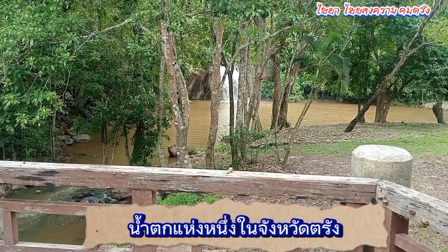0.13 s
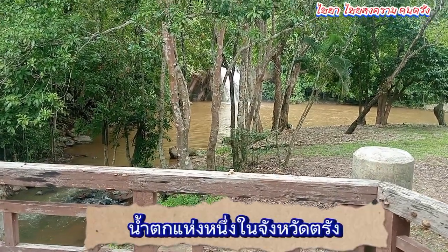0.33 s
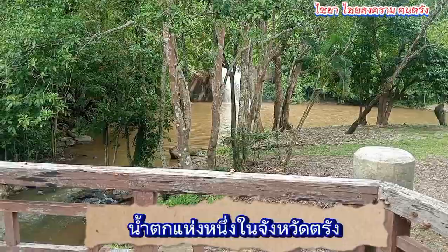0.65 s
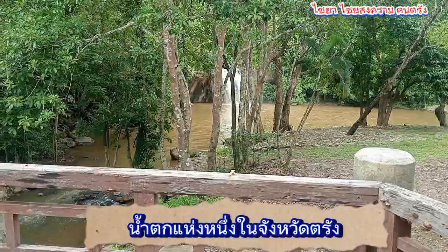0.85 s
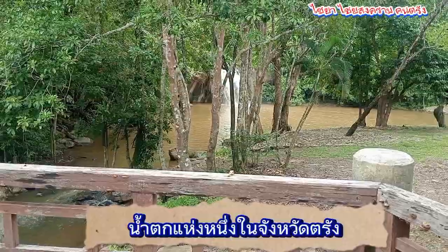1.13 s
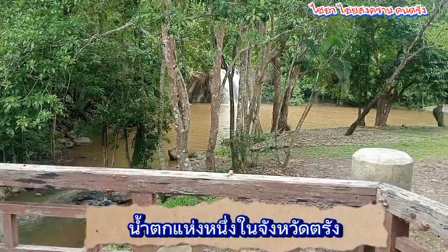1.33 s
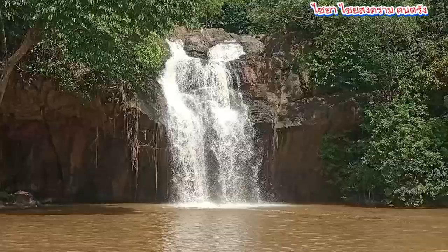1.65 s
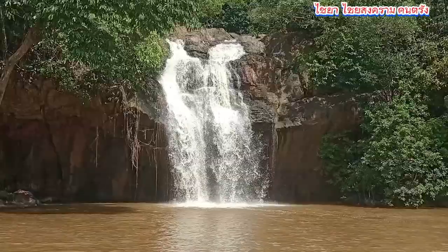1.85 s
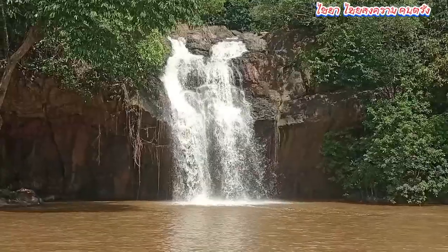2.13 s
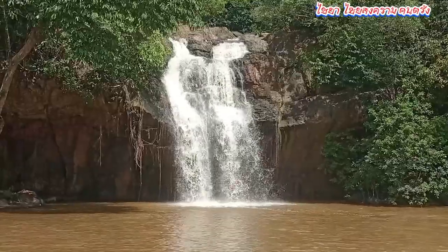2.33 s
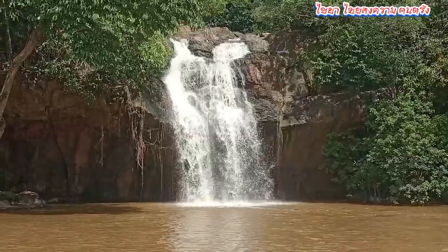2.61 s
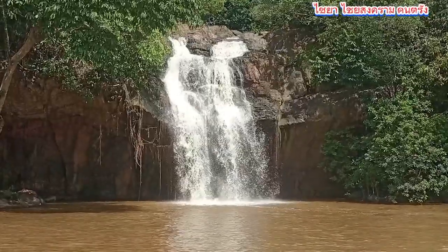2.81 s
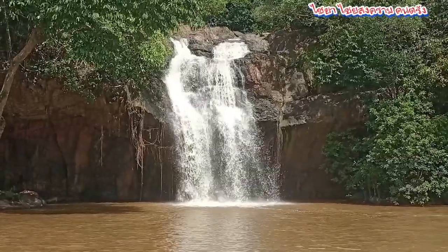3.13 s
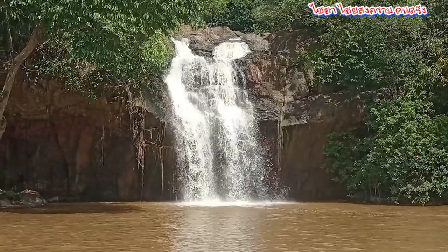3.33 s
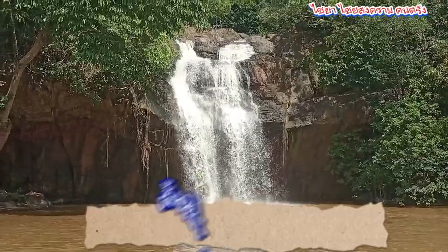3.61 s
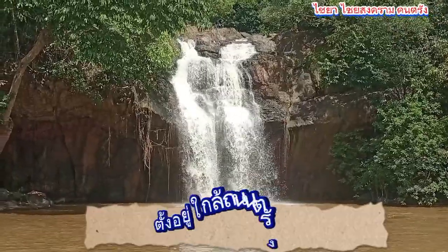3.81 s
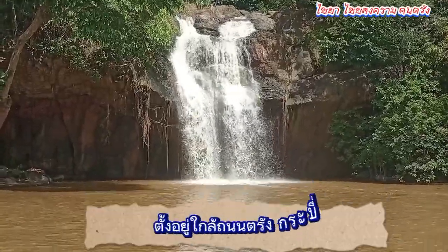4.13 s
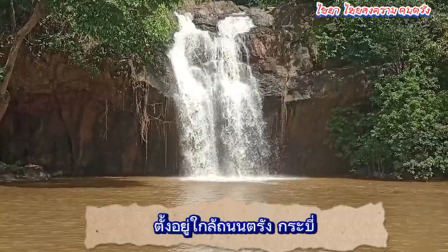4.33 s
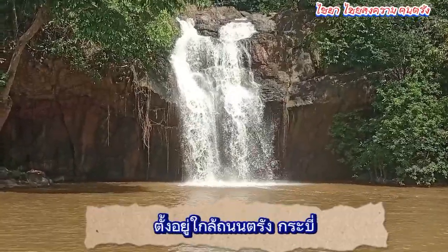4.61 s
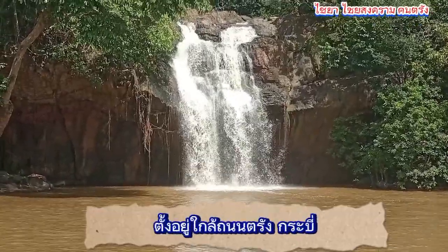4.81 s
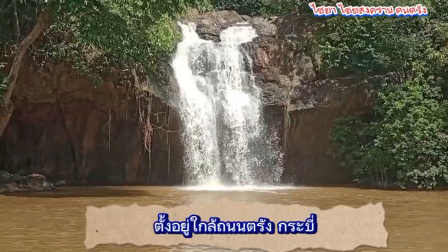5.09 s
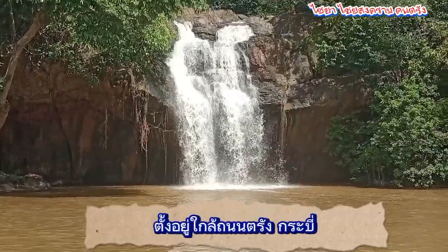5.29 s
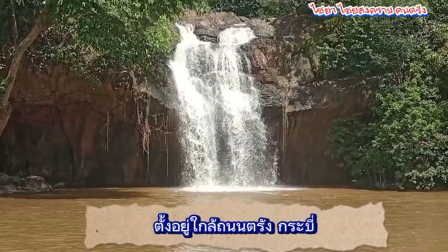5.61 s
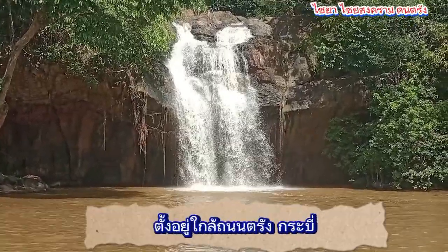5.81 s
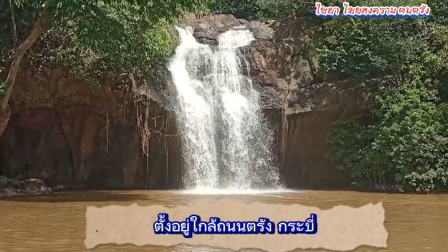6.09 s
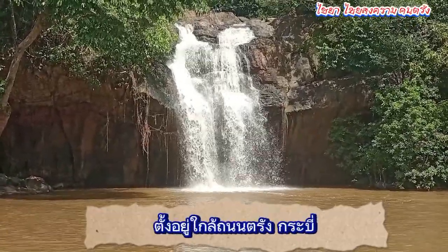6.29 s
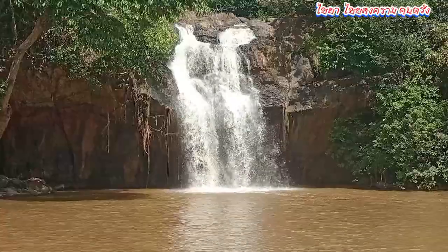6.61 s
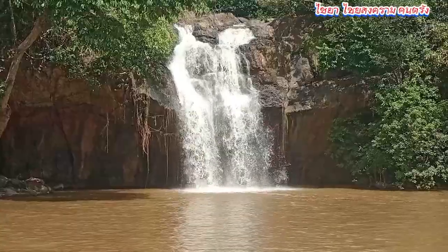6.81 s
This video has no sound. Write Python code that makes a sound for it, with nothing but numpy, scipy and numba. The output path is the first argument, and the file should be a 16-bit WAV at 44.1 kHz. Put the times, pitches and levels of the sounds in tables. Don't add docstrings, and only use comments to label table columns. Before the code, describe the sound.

Outdoors in a forest, a distant swollen river rushes smoothly while one cicada buzzes faintly, thin insects whistle very high and a far motor hums in soft swells. It cuts to a blink of silence, then a much louder waterfall surges in, drumming into its pool, with a throbbing cicada chorus and a low engine drone. One phone microphone, nearly mono, no reverberant space.

```python
import sys
import numpy as np
from scipy import signal
from scipy.fft import rfft, irfft
from scipy.io import wavfile
from scipy.ndimage import uniform_filter1d
from numba import njit

SR = 44100
rng = np.random.default_rng(int(sys.argv[2]) if len(sys.argv) > 2 else 0)


def persist_wave(psi):
    counts = np.round(np.clip(psi, -1, 1) * 32767).astype(np.int16)
    wavfile.write(sys.argv[1], SR, np.atleast_2d(counts).T)


def volts(x):
    e = np.asarray(x, float) / 20
    return 10 ** e


N = 306495
TIME = np.arange(N) / SR
FREQ = np.fft.rfftfreq(N, 1 / SR)
TOP_HZ = 15530
STOP_S, START_S = 1.6695, 1.7295

# time_s, length_s, level_db
HUM = [
    (.15, .26, -48),
    (.35, .16, -49),
    (.56, .3, -47),
    (.8, .22, -54),
    (1.06, .16, -50),
    (1.19, .12, -48),
    (1.33, .15, -48),
    (1.62, .14, -48),
]
# time_s, firing_rate_hz, level_db
ENGINE = [
    (1.74, 41.2, 0.5),
    (2.6, 40.51, -2),
    (3.6, 39.47, 1.5),
    (4.5, 38.37, 0.5),
    (5.4, 37.85, -0.5),
    (6.17, 36.98, -4),
    (6.95, 35.73, -2),
]
# multiple of firing rate, level_db, fade_db_per_s
ENGINE_TONES = [(2, -43, 3), (3, -45.5, 0), (4, -45, 0), (5, -45.5, 0), (6, -45, .5), (7, -47, 0),
                (8, -49, 0.5), (9, -49.5, 0.5)]
# time_s, length_s, multiple, boost_db
CLEARINGS = [(2.75, .4, 2, 5), (3.3, 0.27, 2, 7), (5.62, 0.89, 2, 8), (2.53, 1.6, 4, 6.5),
             (3.87, 0.38, 4, 6), (6.2, .4, 4, 5), (5.62, 0.27, 4, 6), (6.62, 0.79, 4, 9),
             (2.685, 0.37, 5, 13.5), (3.45, .3, 5, 8.5), (3.75, 0.38, 5, 6.5), (3.46, 0.41, 6, 8.5),
             (4.22, .3, 6, 7), (4.85, .5, 6, 8.5), (4.95, 0.32, 3, 5), (6.83, .3, 3, 6), (3.45, .5, 7, 6),
             (4.2, .4, 7, 6), (4.78, .3, 7, 6)]
# time_s, resonance_hz
BANK_CICADA = [
    (0, 6770),
    (.47, 6520),
    (1.06, 6900),
    (1.36, 6620),
    (1.52, 6510),
    (1.67, 6560),
]
# start_s, end_s, start_hz, end_hz, level_db
WHISTLES = [
    (.2, .58, 11780, 11500, -64),
    (.62, .8, 11480, 11380, -65),
    (.03, .22, 10950, 10800, -65),
    (.28, .6, 11000, 10850, -66),
    (.62, .95, 10850, 10950, -66),
    (1.02, 1.36, 10850, 11000, -64),
    (1.38, 1.68, 11820, 11520, -63),
]
# time_s, length_s, change_db
CHORUS_SWELLS = [
    (2.12, .3, 3),
    (2.31, .1, -8),
    (2.393, .06, 2),
    (3.19, .08, 1),
    (4.05, 0.42, 1.5),
    (4.516, .25, 2),
    (5.6, .15, 2),
    (6.0, .2, 2.5),
    (6.53, .3, 3),
]
# time_s, length_s, change_db
HEAVES = [(.44, 0.14, 2), (.87, .12, -2), (1.27, 0.27, 1), (1.47, .12, -3), (2.42, 0.14, 1.5),
          (2.673, 0.16, 0), (3.103, 0.29, -1.5), (3.39, .12, 0.5), (3.5, 0.11, 2), (3.85, .2, 0),
          (4.02, .12, -1.5), (4.296, .2, 2.5), (4.409, 0.073, -5), (4.55, .15, 1.5), (4.77, 0.17, 2.5),
          (4.9, .1, -3), (5.08, 0.23, 0), (5.45, .25, -0.5), (5.62, .15, 1), (5.96, 0.13, 1),
          (6.301, 0.58, -0.5), (6.9, .2, -3)]
# pitch_hz, level_db (per Hz)
RIVER_RUMBLE = [(50, -40), (85, -10), (92, -2.5), (125, -2.5), (166, -3), (217, -2.5), (329, -3.5),
                (413, -11), (544, -8), (577, -3.5), (625, -6.5), (717, -2), (900, -8.5), (1170, -35),
                (1980, -120)]
RIVER_HISS = [(530, -45), (900, -14.5), (1030, -8), (1120, -8.5), (1350, -4.5), (1620, -10), (1880, -5),
              (2100, -8.5), (2420, -5), (3200, -8), (3440, -10), (4330, -17), (5000, -24), (6500, -49),
              (11000, -120)]
RIVER_SPRAY = [(2940, -35), (5000, -10), (5850, -8.5), (6870, -6.5), (7550, -11), (8740, -2), (9430, -1.5),
               (10400, -7), (11800, -8.5), (12300, -11), (15500, -18)]
FALL_RUMBLE = [(21, -50), (35, -29.5), (89, -6), (174, -1), (248, -1.5), (352, -6.5), (426, -11), (537, -8),
               (900, -9.5), (1170, -49), (1980, -120)]
FALL_HISS = [(530, -19), (900, -8.5), (1460, -8.5), (1750, -4.5), (2680, -7.5), (3000, -6.5), (3570, -1),
             (4520, -11.5), (5000, -18), (6500, -36), (11000, -120)]
FALL_SPRAY = [(2940, -42), (5000, -14.5), (5600, -9), (6070, -8), (6610, -5.5), (7770, -12.5), (9890, -4),
              (11900, -15.5), (13700, -20), (14900, -18), (15500, -23)]
# hiss_db, rumble_minus_hiss_db, spray_minus_hiss_db
RIVER_LEVELS = (-41, -0.56, -9.5)
FALL_LEVELS = (-31, -4, -8.5)
# time_s, centre_hz
WIDE_MOMENTS = [(.109, 9650), (.805, 6280), (1.13, 4700), (1.13, 12080), (1.641, 9650), (2.222, 7900),
                (2.222, 12400), (2.315, 4700), (2.315, 6940), (2.315, 12780), (2.338, 5490), (2.5, 5170),
                (2.5, 12440), (3.011, 9000), (3.127, 7610), (3.336, 4670), (3.94, 14500), (4.01, 9670),
                (4.219, 8940), (4.59, 8640), (5.217, 7950), (5.287, 4960), (6.053, 11380), (6.123, 11050),
                (6.425, 5210)]


def unit(x):
    return x / np.sqrt(np.mean(x ** 2))


def curves(table):
    s, *columns = np.transpose(table)
    return [np.interp(TIME, s, column) for column in columns]


def walk(rate_hz):
    hold = int(SR / rate_hz)
    steps = np.repeat(rng.standard_normal(N // hold + 1), hold)[:N]
    return 1.1 * uniform_filter1d(uniform_filter1d(steps, hold), hold)


def swell(s, length_s):
    return np.cos(np.pi * np.clip((TIME - s) / length_s, -.5, .5)) ** 2


def ring(x, hz, width_hz):
    pole = np.exp((2j * np.pi * hz - np.pi * width_hz) / SR)
    a = [1, -2 * pole.real, abs(pole) ** 2]
    once = signal.lfilter([1], a, x)
    return unit(signal.lfilter([1, 0, -1], a, once))


def heave():
    return sum(db * swell(s, length_s) for s, length_s, db in HEAVES)


def motor():
    hz = 68 + 2.5 * walk(9)
    level = sum(volts(db) * swell(s, length_s) for s, length_s, db in HUM)
    hum = level * np.sin(2 * np.pi * np.cumsum(hz) / SR)
    ground = ring(rng.standard_normal(N), 32, 40)
    return hum + volts(-73) * ground


def engine():
    hz, level_db = curves(ENGINE)
    phase = 2 * np.pi * np.cumsum(hz * (1 + .003 * walk(8))) / SR
    out = 0
    for multiple, db, fade in ENGINE_TONES:
        clear_db = sum(up * swell(s, length_s) for s, length_s, m, up in CLEARINGS if m == multiple)
        path_db = db + level_db - fade * (TIME - START_S) + clear_db + 2.5 * walk(6)
        wander = 0.64 * walk(9)
        out = out - volts(path_db) * np.cos(multiple * phase + wander)
    scatter_db = 2.5 * walk(40)
    return out * volts(scatter_db + 0.71 * heave())


def bank_cicada():
    click_hz = 157.3
    body_hz, = curves(BANK_CICADA)
    cycle = 2 * np.pi * np.cumsum(click_hz * (1 + .0012 * walk(12))) / SR
    out = 0
    for k in range(38, 47):
        tuning_db = -6 * ((click_hz * k - body_hz) / 450) ** 2
        level = volts(-68 + tuning_db + 4.6 * walk(6.9))
        out = out + level * np.sin(k * cycle + 2 * np.pi * rng.random())
    return out


def whistles():
    wobble_hz = 22 * walk(80)
    flutter = volts(1.5 + 2.5 * walk(30))
    out = 0
    for start, end, start_hz, end_hz, db in WHISTLES:
        part = np.clip((TIME - start) / (end - start), 0, 1)
        hz = start_hz + (end_hz - start_hz) * part + wobble_hz
        tone = np.sin(2 * np.pi * np.cumsum(hz) / SR)
        shape = np.sqrt(np.sin(np.pi * part).clip(0))
        out = out + volts(db) * shape * flutter * tone
    return out


def cicada(click_hz, drift, jitter, body_hz, width_hz):
    rate_hz = click_hz * (1 + drift * walk(3) + jitter * walk(150))
    cycle = np.floor(np.cumsum(rate_hz) / SR)
    clicks = np.diff(cycle, prepend=0) * volts(2.5 * rng.standard_normal(N))
    fade = np.exp(-np.arange(600) / 130)
    path_a = signal.fftconvolve(clicks, rng.standard_normal(600) * fade)[:N]
    path_b = signal.fftconvolve(clicks, rng.standard_normal(600) * fade)[:N]
    turn = np.pi * walk(2)
    return ring(np.cos(turn) * path_a + np.sin(turn) * path_b, body_hz, width_hz)


def cicada_chorus():
    first = cicada(137, drift=.006, jitter=.008, body_hz=6670, width_hz=300)
    second = cicada(118, drift=.004, jitter=.006, body_hz=6850, width_hz=900)
    far = ring(rng.standard_normal(N), 6545, 200)
    swells_db = sum(up * swell(s, length_s) for s, length_s, up in CHORUS_SWELLS)
    level_db = -45.5 + 1.1 * walk(12) + swells_db
    return volts(level_db) * unit(first + .55 * second + .95 * far) * volts(.8 * walk(25))


@njit
def bubbles(start, hz, size, cycles, glide):
    out = np.zeros(N)
    for k in range(len(start)):
        step = 2 * np.pi * hz[k] / SR
        fade = np.exp(-hz[k] / (cycles * SR))
        length = int(4 * cycles * SR / hz[k])
        z = size[k] + 0j
        spin = fade * np.exp(1j * step)
        turn = np.exp(1j * step * glide / length)
        for i in range(start[k], min(start[k] + length, N)):
            z = z * spin
            spin = spin * turn
            out[i] += z.imag
    return out


def water(colour, per_s, cycles, ringing, surge_db, flicker_db):
    hz, db = np.transpose(colour)
    when, pitch, size = rng.random((int(per_s * N / SR), 3)).T
    pitch = hz[1] + pitch * (min(hz[-2], TOP_HZ) - hz[1])
    start = (when * N).astype(np.int64)
    rung = bubbles(start, pitch, np.sqrt(pitch) * volts(9 * size), cycles, .02)
    ring_level = ringing * np.sqrt(2 * np.ptp(pitch) / SR)
    source = ring_level * unit(rung) + rng.standard_normal(N)

    octave = np.log2(np.maximum(FREQ, 1))
    coloured = rfft(source) * volts(np.interp(octave, np.log2(hz), db))
    out, surge = 0, walk(6.5)
    for centre in np.arange(np.log2(hz[0]), np.log2(hz[-1]) + 1 / 3, 1 / 3):
        shape = np.cos(np.pi / 2 * np.clip(3 * (octave - centre), -1, 1)) ** 2
        band = irfft(coloured * shape, N)
        surge = .8 * surge + .6 * walk(5)
        out = out + band * volts(surge_db * surge + flicker_db * walk(14))
    return unit(out)


def torrent(levels_db, rumble_colour, hiss_colour, spray_colour):
    hiss_db, rumble_db, spray_db = levels_db
    rumble = water(rumble_colour, per_s=250, cycles=8.0, ringing=.6, surge_db=.35, flicker_db=.9)
    hiss = water(hiss_colour, per_s=900, cycles=45.0, ringing=.7, surge_db=.2, flicker_db=.4)
    spray = water(spray_colour, per_s=2500, cycles=110.0, ringing=.85, surge_db=.2, flicker_db=.3)
    heave_db = 1.04 * walk(10) + 0.52 * heave()
    return volts(hiss_db) * (hiss + volts(rumble_db + heave_db) * rumble + volts(spray_db) * spray)


def river():
    return torrent(RIVER_LEVELS, RIVER_RUMBLE, RIVER_HISS, RIVER_SPRAY)


def waterfall():
    return torrent(FALL_LEVELS, FALL_RUMBLE, FALL_HISS, FALL_SPRAY)


def scene():
    bank = motor() + bank_cicada() + whistles() + river()
    bank = bank * np.clip((STOP_S - TIME) / 0.00094, 0, 1)

    pool = engine() + cicada_chorus() + waterfall()
    since = TIME - START_S
    fade_s, fade_from = .26, 0.16
    fade = np.clip(fade_from + (1 - fade_from) * since / fade_s, 0, 1)
    fade = fade * np.clip(since / 0.0015, 0, 1)
    gain = volts(3 * np.exp(-np.maximum(since - fade_s, 0) / 0.16))
    return np.tile(bank + pool * fade * gain, (2, 1))


def low_pass(x):
    return signal.sosfilt(signal.butter(12, 16280, fs=SR, output="sos"), x)


def record(dry):
    noise, heard = rfft(rng.standard_normal(N)), rfft(dry[0])
    side = np.zeros(N)
    for s, hz in WIDE_MOMENTS:
        window = np.cos(np.pi * np.clip((TIME - s) / (2048 / SR), -.5, .5)) ** 1.5
        band = abs(FREQ - hz) < 0.18 * hz / 2
        in_band = window * irfft(heard * band, N)
        strength = np.sqrt(np.sum(in_band ** 2) / np.sum(window ** 2))
        side = side + volts(-2.5) * strength * window * unit(irfft(noise * band, N))
    wide = dry + side * np.array([[1], [-1]])
    mix = irfft(rfft(wide) * (FREQ < TOP_HZ), N)
    return low_pass(mix)


dry = scene()
out = record(dry)
persist_wave(out)
```